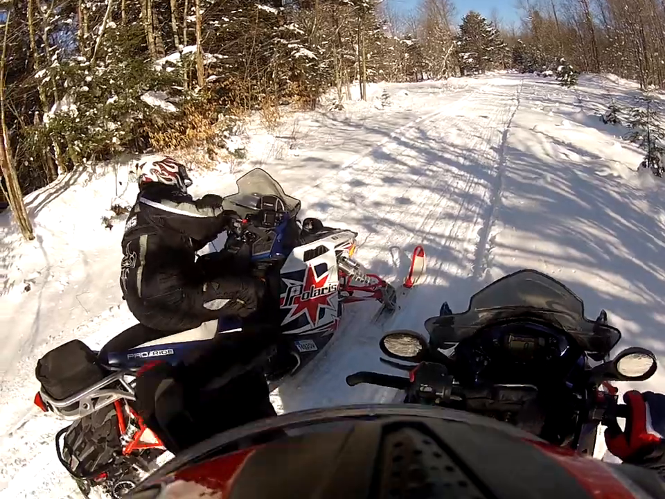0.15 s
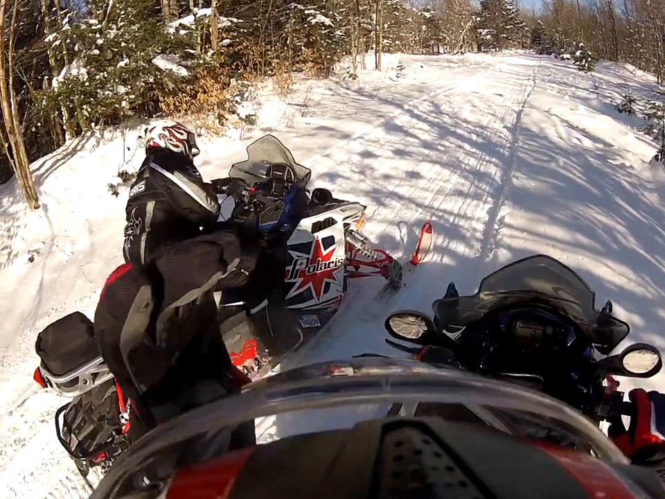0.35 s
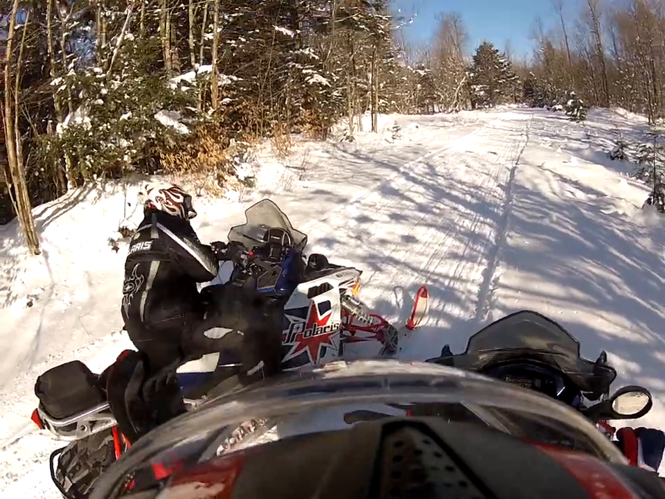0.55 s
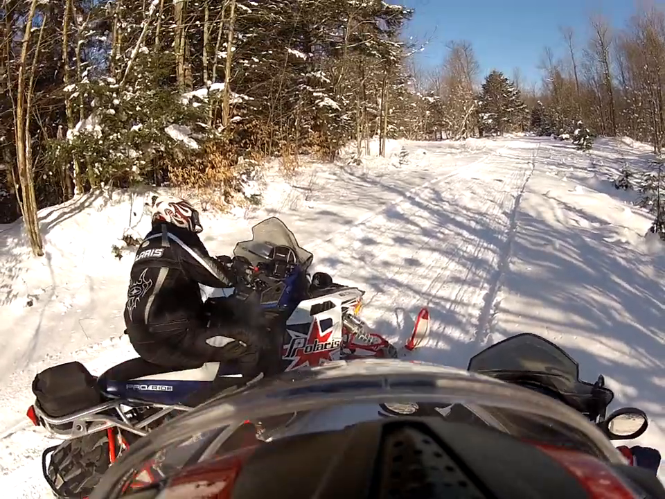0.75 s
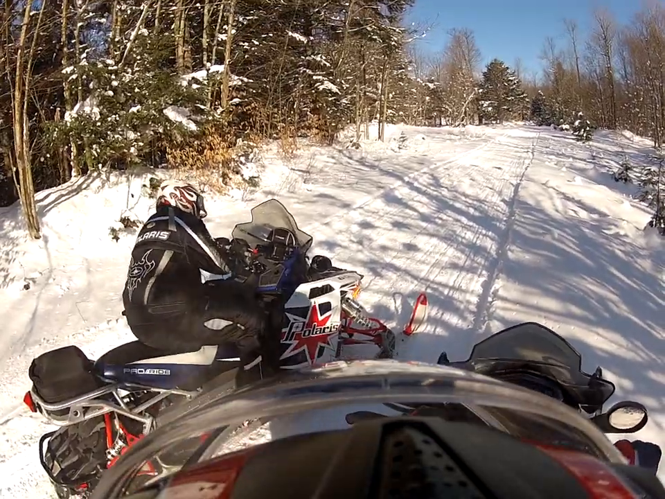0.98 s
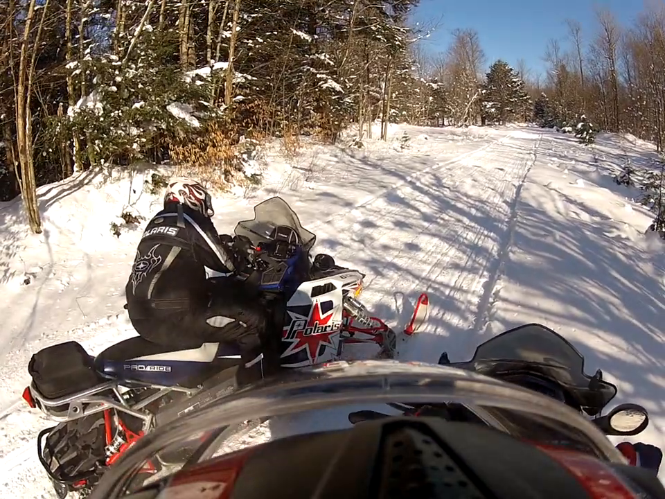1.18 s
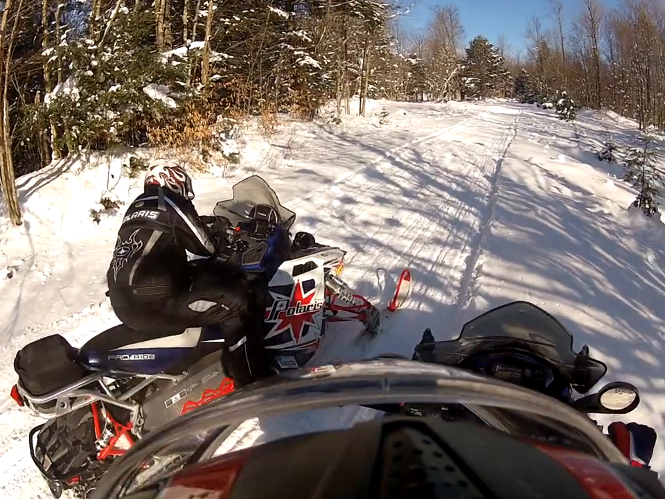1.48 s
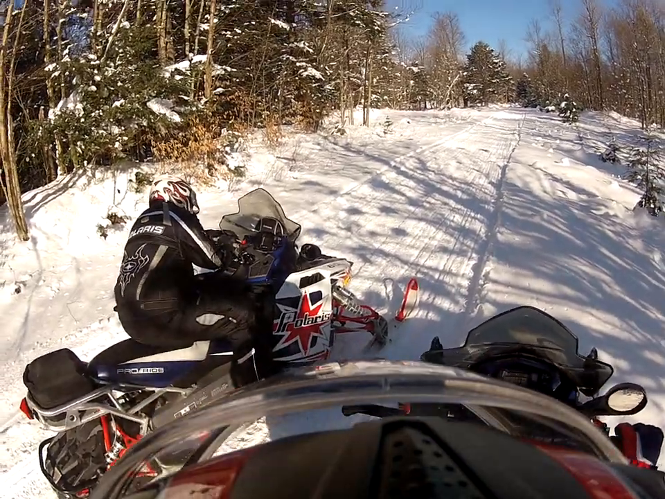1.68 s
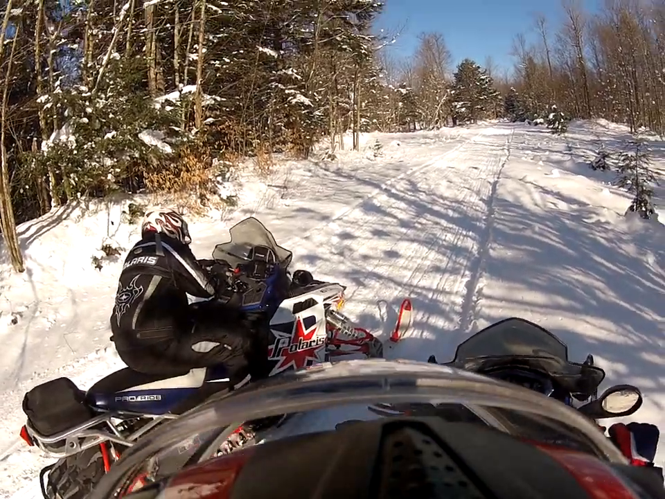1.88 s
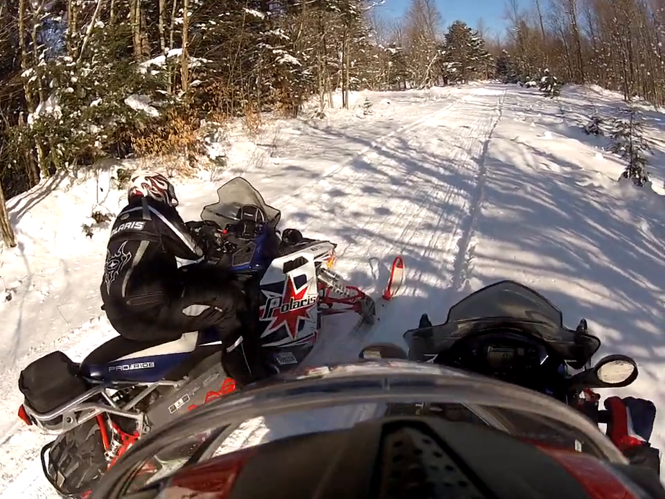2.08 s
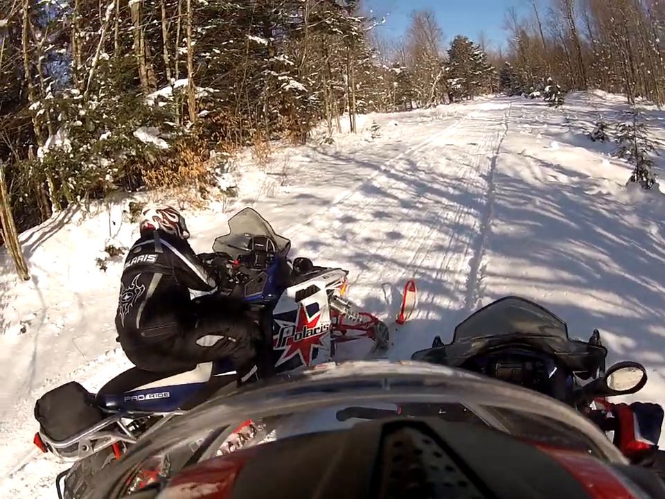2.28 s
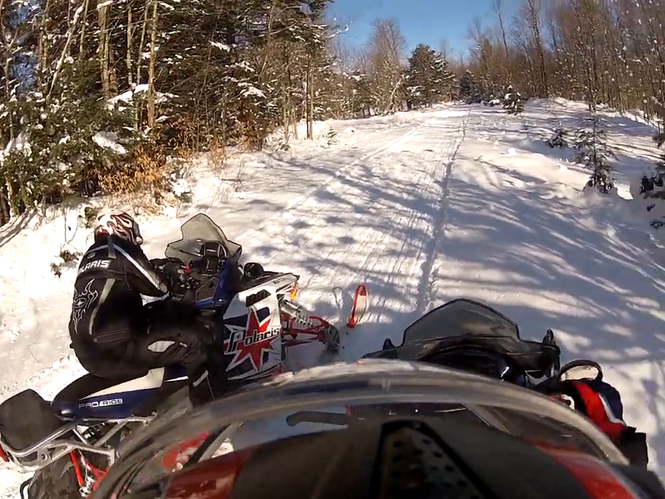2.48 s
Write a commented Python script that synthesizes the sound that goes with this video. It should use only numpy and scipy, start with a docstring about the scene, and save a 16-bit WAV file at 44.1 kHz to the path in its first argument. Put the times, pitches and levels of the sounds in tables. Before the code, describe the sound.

Close on a helmet, plastic clicks, squeaks and scrapes in jerks, then hits its stop with an overloaded thud; quiet snowmobile idling continues on an open snowy trail, gritty and narrow in sound.

```python
"""A plastic click at the helmet comes first, over two-stroke snowmobiles idling on a snowy trail.
Their low hum is a locked harmonic series, their uneven pops are damped exhaust modes, their clatter is noise.
At the helmet microphone something plastic, probably the visor, scrapes, judders and hits its stop with a thump.
The microphone link ducks after the thump, overloads, and holds its samples at 8 kHz, which adds a gritty treble."""
import sys
import numpy as np
from scipy import signal
from scipy.fft import rfft, irfft, next_fast_len
from scipy.io import wavfile
from scipy.ndimage import map_coordinates

SR = 44100
rng = np.random.default_rng(int(sys.argv[2]) if len(sys.argv) > 2 else 0)


def dump_mix(stems):
    """Bounce the given channels to the path in sys.argv[1] as a 16-bit WAV at rate SR."""
    frames = np.atleast_2d(stems).T  # one column per channel
    limited = np.clip(frames, -1, 1)  # hard clip at full scale
    pcm = np.round(limited * 32767).astype(np.int16)
    wavfile.write(sys.argv[1], SR, pcm)


N = 114660
T = np.arange(N) / SR  # time of each sample [s]

# firm exhaust pops: (time [s], relative level [dB])
POP_EVENTS = [(0.027, -38), (0.041, -38), (0.108, -41), (0.127, -40), (0.615, -36), (0.633, -37),
              (0.65, -42), (0.761, -40), (0.815, -38), (0.83, -39), (0.915, -40), (0.982, -39),
              (1.043, -41), (1.062, -41), (1.145, -39), (1.196, -37), (1.22, -41), (1.247, -43),
              (1.278, -43), (1.33, -35), (1.379, -38), (1.496, -40), (1.512, -39), (1.624, -37),
              (1.656, -41), (1.672, -37), (1.736, -39), (1.834, -37), (1.948, -38), (1.989, -39),
              (2.003, -42), (2.065, -36), (2.114, -40), (2.166, -42), (2.179, -40), (2.247, -38),
              (2.263, -37), (2.332, -42), (2.41, -37), (2.428, -43), (2.465, -41), (2.513, -39),
              (2.558, -40)]
# colour of scraping plastic: (frequency [Hz], relative density [dB per Hz])
PLASTIC_SPECTRUM = [(100, 9.5), (400, -11), (650, -0.5), (1200, -2), (1600, -0.5), (2200, 3.5),
                    (2700, -13.5), (3500, -8.5), (4000, -17.5)]
# colour of dull rubbing: (frequency [Hz], relative density [dB per Hz])
RUB_SPECTRUM = [(100, 6.5), (300, -6.5), (700, -6.5), (1500, -28)]
HUM_HZ = 121


def amp(db):
    """Level to amplitude ratio: 20 dB is a factor of ten."""
    return 10 ** (np.asarray(db) / 20)


def unit(x):
    """Normalisation of a signal to an rms of 1."""
    return x / np.sqrt(np.mean(x ** 2) + 1e-20)


def curve(rows):
    """Linear interpolation of (time [s], value) rows to one value per sample."""
    return np.interp(T, *np.transpose(rows))


def filtered(x, response):
    """Linear filtering: the spectrum is multiplied by a response of frequency."""
    size = next_fast_len(N + SR // 2)
    spectrum = rfft(x, size) * response(np.fft.rfftfreq(size, 1 / SR))
    return irfft(spectrum, size)[..., :N]


def noise(spectrum):
    """Coloured noise of rms 1: white noise shaped by (frequency [Hz], density [dB per Hz]) points."""
    f, db = np.transpose(spectrum)
    return unit(filtered(rng.standard_normal(N), lambda hz: amp(np.interp(np.log(hz + 1), np.log(f), db))))


def bell(x, centre, width):
    """Gaussian swell with top 1; the width is its standard deviation."""
    return np.exp(-.5 * ((x - centre) / width) ** 2)


def fade(start, t60, attack):
    """Exponential rise and decay from the start time; the decay loses 60 dB in t60 seconds."""
    t = np.maximum(T - start, 0)
    return (1 - np.exp(-t / attack)) * np.exp(-np.log(1000) * t / t60)


def ring(start, modes, attack):
    """Modal superposition: damped sines of alternating sign, struck together at the start time."""
    total = np.zeros(N)
    for k, (hz, db, t60) in enumerate(modes):
        sine = np.sin(2 * np.pi * hz * (T - start))
        total += (-1) ** k * amp(db) * fade(start, t60, attack) * sine
    return total


def wobble(rate):
    """Band-limited random modulation: a spline through random knots, rate knots a second."""
    knots = rng.standard_normal(int(N * rate / SR) + 4)
    return map_coordinates(knots, [T * rate])


def thump():
    """Impact excitation: the visor hits its stop with a push, a thud and a crack, and the shell booms."""
    THUMP_S, PUSH_S, PUSH_DB = .3602, .0023, 6
    THUD_DB, THUD_S = -3, .0025
    CRACK_DB, CRACK_S = -4, .00296
    CLACK_HZ, CLACK_DB, CLACK_S, CLACK_LAG_S = 2230, 6.5, .0012, .0011
    BOOM_LAG_S = .0004
    # resonances of the helmet shell: (frequency [Hz], level [dB], t60 [s])
    shell = [(70.7, 2, 0.35), (221, -3.5, 0.043), (370, -20.5, 0.054)]
    u = (T - THUMP_S) / PUSH_S
    push = amp(PUSH_DB) * u * np.exp((1 - u * u) / 2)  # a pull, then a push, each peaking at PUSH_DB
    thud = amp(THUD_DB) * noise(RUB_SPECTRUM) * bell(T, THUMP_S, THUD_S)
    crack = amp(CRACK_DB) * noise(PLASTIC_SPECTRUM) * bell(T, THUMP_S, CRACK_S)
    clack = amp(CLACK_DB) * np.sin(2 * np.pi * CLACK_HZ * T) * bell(T, THUMP_S + CLACK_LAG_S, CLACK_S)
    boom = ring(THUMP_S + BOOM_LAG_S, shell, attack=0.0031)
    return push + thud + crack + clack + boom


def visor_slide():
    """Stick-slip friction: the visor scrapes in bursts, squeaks loose and judders along in a few slips."""
    SQUEAK_HZ, SQUEAK_WIDTH_HZ, SQUEAK_DB, SQUEAK_AT_S, SQUEAK_S = 1930, 170, -18, .198, .007
    GRAIN_DB, GRAIN_KNOTS_PER_S = 1, 500
    JUDDER_HZ, RUB_DB = 54, -25.5
    # scraping bursts: (time [s], width [s], level [dB])
    scrapes = [(0.191, 0.0039, -21), (0.207, 0.0075, -18), (0.237, 0.0058, -20), (.269, 0.0043, -22.5),
               (0.305, 0.012, -24.5), (.345, 0.0095, -37)]
    # each judder pulls and then pushes the shell: (time [s], peak level [dB], half length [s])
    judders = [(0.2325, -2.5, 0.0032), (0.266, -.5, 0.0088), (.301, -5, 0.0035), (0.326, -12, 0.0035)]
    bursts = sum(amp(db) * bell(T, s, width) for s, width, db in scrapes)
    scrape = noise(PLASTIC_SPECTRUM) * bursts
    squeak = unit(filtered(rng.standard_normal(N), lambda hz: bell(hz, SQUEAK_HZ, SQUEAK_WIDTH_HZ)))
    out = scrape + amp(SQUEAK_DB) * squeak * bell(T, SQUEAK_AT_S, SQUEAK_S)
    out = out * unit(amp(GRAIN_DB * wobble(GRAIN_KNOTS_PER_S)))  # grainy loudness
    rub = amp(RUB_DB) * noise(RUB_SPECTRUM)
    for s, db, half in judders:
        shove = bell(T, s, 0.99 * half) * np.sin(2 * np.pi * JUDDER_HZ * (T - s))
        out += amp(db) * (shove / shove.max() + rub * bell(T, s, half))
    return out


def ticks():
    """Transient excitation: plastic clicks, each with its own pitch and crisp edge, knock helmet modes."""
    TICK_DB, EDGE_DB = -4, 2.5  # added to the levels in the table
    TICK_T60_S, TICK_RING, TICK_KNOCK = 0.026, 0.93, 0.73
    # clicks: (time [s], relative level [dB], pitch [Hz], relative level of the crisp edge [dB])
    tick_events = [(0.0409, -11.5, 1577, -53.5), (0.1471, -24.5, 1790, -44), (0.387, -27.5, 1140, -59),
                   (0.4709, -29, 1280, -53), (0.5149, -26.5, 1574, -61), (0.6175, -32, 2300, -56),
                   (0.7079, -35.5, 2150, -46), (1.4117, -35, 2240, -50), (1.4501, -36, 1336, -44.5),
                   (1.472, -35, 2050, -58), (1.696, -33, 1360, -57), (1.8514, -38.5, 1190, -74),
                   (2.144, -38.5, 2310, -64), (2.2268, -28, 1340, -54), (2.4619, -33.5, 1280, -38)]
    # what a tick rings in the helmet: (frequency [Hz], relative level [dB], t60 [s])
    tick_modes = [(111, -2, 0.07), (900, -7, 0.036)]
    # colour of the body of a tick: (frequency [Hz], relative density [dB per Hz])
    grit_spectrum = [(200, -18), (600, -2.5), (1000, -6.5), (1600, 7), (2200, 1.5), (2700, -20.5),
                     (4000, -20.5)]
    # colour of its crisp edge: (frequency [Hz], relative density [dB per Hz])
    edge_spectrum = [(1500, -19), (2600, 4.5), (3800, -12)]
    grit, edge, out = noise(grit_spectrum), noise(edge_spectrum), np.zeros(N)
    for s, db, hz, edge_db in tick_events:
        shape = fade(s, TICK_T60_S, attack=0.0011)
        click = shape * (grit + TICK_RING * np.sin(2 * np.pi * hz * (T - s)))
        knock = TICK_KNOCK * ring(s, tick_modes, attack=0.00033)
        out += amp(db + TICK_DB) * (click - knock)
        out += amp(edge_db + EDGE_DB) * shape * edge
    return out


def engine_turns():
    """Phase locking: the idle hunts a little so that a whole cycle of hum falls just after every pop."""
    HUM_LAG_S = .0058
    times = np.transpose(POP_EVENTS)[0] + HUM_LAG_S
    turns = np.append(0, np.cumsum(np.round(np.diff(times) * HUM_HZ)))
    return HUM_HZ * T + np.interp(T, times, turns - HUM_HZ * times)


def engines():
    """Periodic combustion: harmonic hum, pops ringing the exhaust, rumble, and clatter pulsing in step."""
    HUM_DB, POP_DB = -1, 3  # added to the levels in the tables
    POP_VARIES_DB, POP_ATTACK_S = 1, .002
    RUMBLE_DB, CLATTER_PULSING = -43, .2
    # overtones of the hum: (multiple of the hum frequency, relative level [dB])
    hum_orders = [(.5, -20), (1, 0), (2, -20)]
    # the hum swells and fades: (time [s], relative level [dB])
    hum_level = [(0, -49), (.3, -25), (.62, -38), (.85, -37), (.97, -38.5), (1.1, -37.5), (1.22, -31.5),
                 (1.28, -81), (1.4, -44), (1.47, -34.5), (1.72, -36.5), (1.8, -43.5), (1.9, -36),
                 (2.1, -37), (2.21, -50), (2.33, -34), (2.4, -66), (2.47, -39), (2.6, -36.5)]
    # exhaust resonances: (frequency [Hz], relative level [dB], t60 [s])
    exhaust = [(74.5, 2.5, 0.1), (108, 4, 0.083), (230.6, 0, 0.037), (303.4, -3, 0.045)]
    # colour of the rumble: (frequency [Hz], relative density [dB per Hz])
    rumble_spectrum = [(10, -6.5), (45, -10), (62, 3), (105, 4.5), (165, -12.5), (200, -12.5), (260, -11),
                       (320, -16), (420, -22), (600, -31), (1500, -51)]
    # colour of the mechanical clatter: (frequency [Hz], relative density [dB per Hz])
    clatter_spectrum = [(200, -26), (450, -16.5), (640, -2.5), (900, -6.5), (1250, 5.5), (1500, -1),
                        (2250, 4), (2550, -8.5), (3500, -8.5), (4000, -12.5)]
    # loudness of the clatter: (time [s], level [dB])
    clatter_level = [(0, -51), (.4, -53), (1.2, -55), (2, -52.5), (2.5, -54.5), (2.6, -45.5)]
    phase = 2 * np.pi * (engine_turns() + 0.11 * wobble(25.34))  # jitter in cycles
    overtones = sum(amp(db) * np.cos(k * phase) for k, db in hum_orders)
    hum = unit(overtones) * amp(curve(hum_level) + HUM_DB)
    pops = np.zeros(N)
    for s, db in POP_EVENTS:
        pop_db = db + POP_DB + POP_VARIES_DB * rng.standard_normal()
        pops += amp(pop_db) * ring(s, exhaust, POP_ATTACK_S)
    pulsing = 1 + CLATTER_PULSING * np.cos(phase / 2)  # at half the hum frequency
    clatter = noise(clatter_spectrum) * pulsing * amp(curve(clatter_level))
    return hum + pops + clatter + amp(RUMBLE_DB) * noise(rumble_spectrum)


def scene():
    """Superposition: every source adds at one microphone, copied to both channels."""
    mono = thump() + visor_slide() + ticks() + engines()
    return np.tile(mono, (2, 1))


def held(x):
    """Sample and hold: the band is cut below 4 kHz, sampled at 8 kHz, clipped, and each sample is held."""
    CLIP_LEVEL = 1
    narrow = filtered(x, lambda hz: 1 / np.sqrt(1 + (hz / 3750) ** 60))
    fine = signal.resample_poly(narrow, 160, 147, axis=1)  # to 48 kHz
    coarse = np.clip(fine[:, ::6], -CLIP_LEVEL, CLIP_LEVEL)
    steps = np.repeat(coarse, 6, axis=1)  # the steps leave images above 4 kHz
    return signal.resample_poly(steps, 147, 160, axis=1)[:, :N]


def record(dry):
    """Gain compression: smoothed past power lowers the gain before the overloading link and a band limit."""
    DUCK_POWER, DUCK_S, TOP_HZ = 0.37, 0.17, 15200  # at DUCK_POWER the gain is halved
    memory = bell(T[:SR // 2], DUCK_S / 2, DUCK_S / 5)  # the gain answers most after half of DUCK_S
    power = np.abs(signal.fftconvolve(dry[0] ** 2, memory / memory.sum())[:N])
    ducked = dry / (1 + power / DUCK_POWER)
    return filtered(held(ducked), lambda hz: 1 / np.sqrt(1 + (hz / TOP_HZ) ** 100))


dry = scene()
out = record(dry)
dump_mix(out)
```